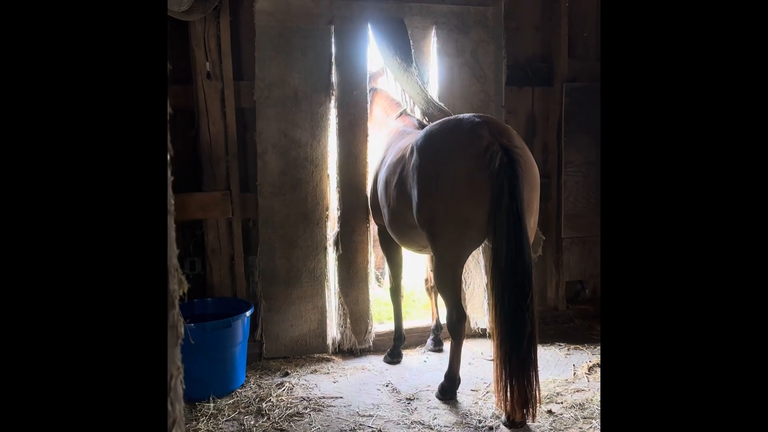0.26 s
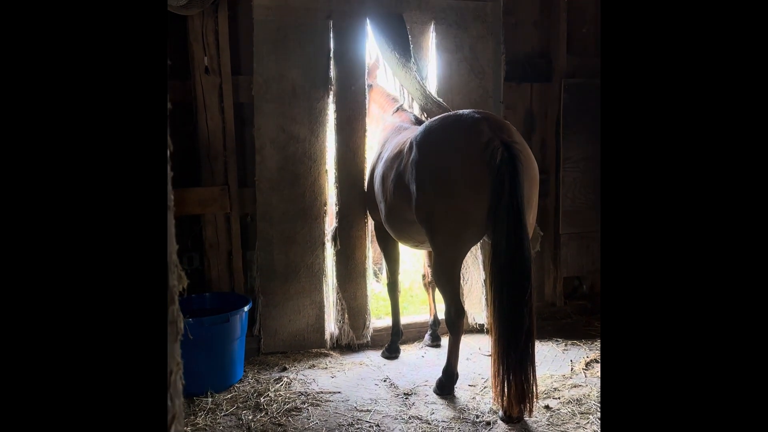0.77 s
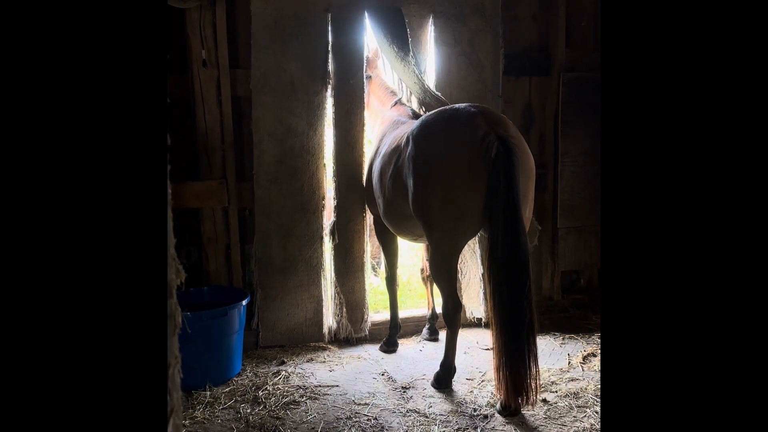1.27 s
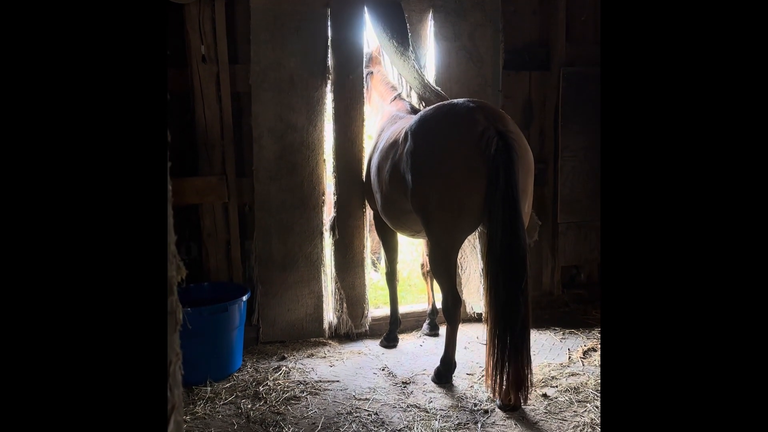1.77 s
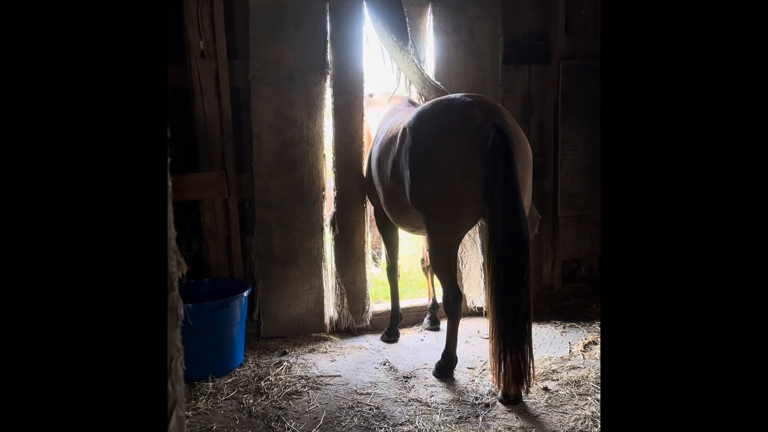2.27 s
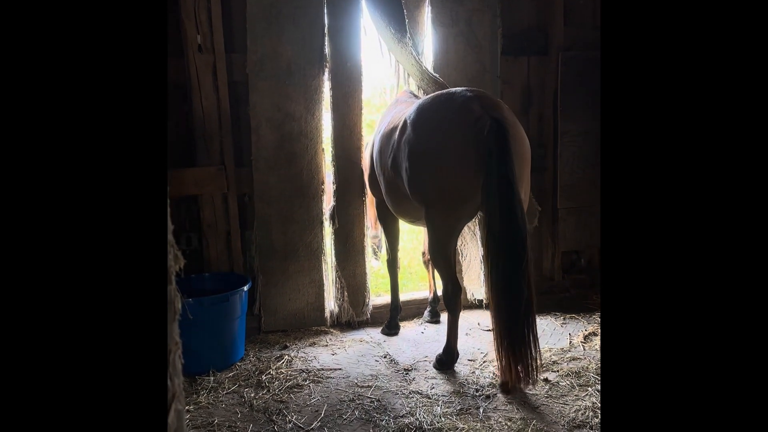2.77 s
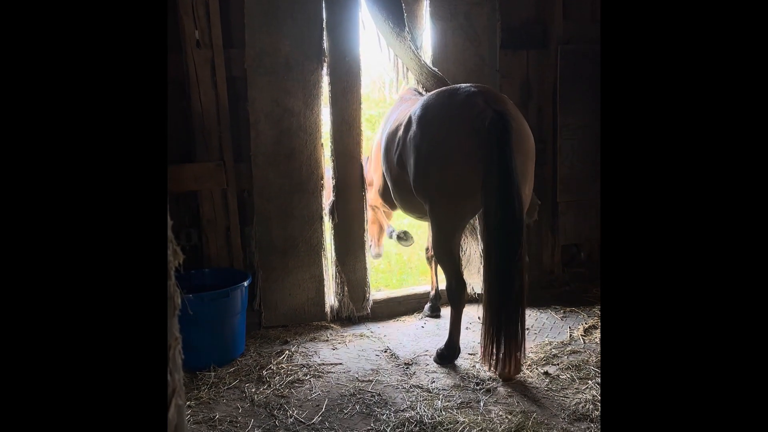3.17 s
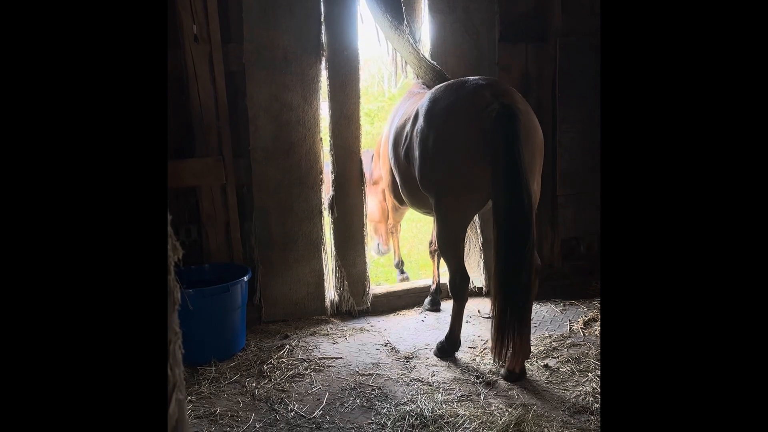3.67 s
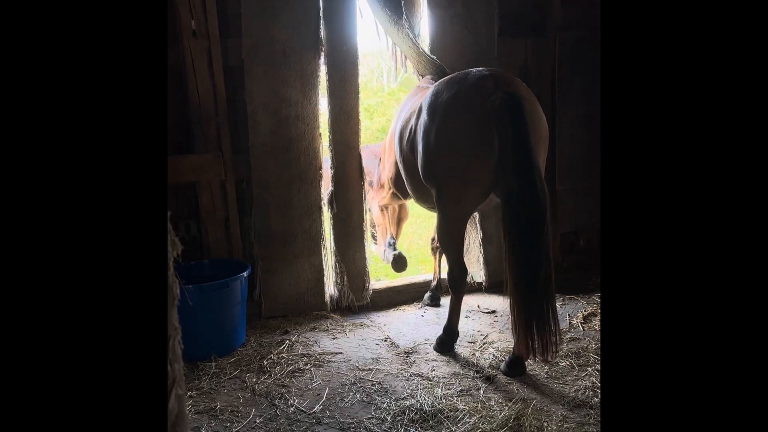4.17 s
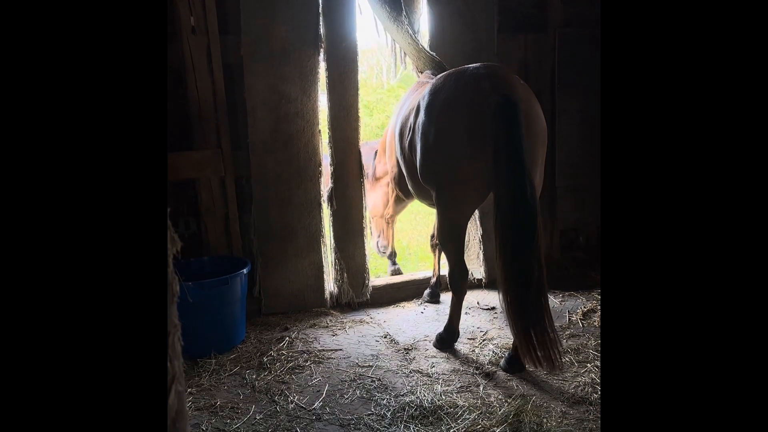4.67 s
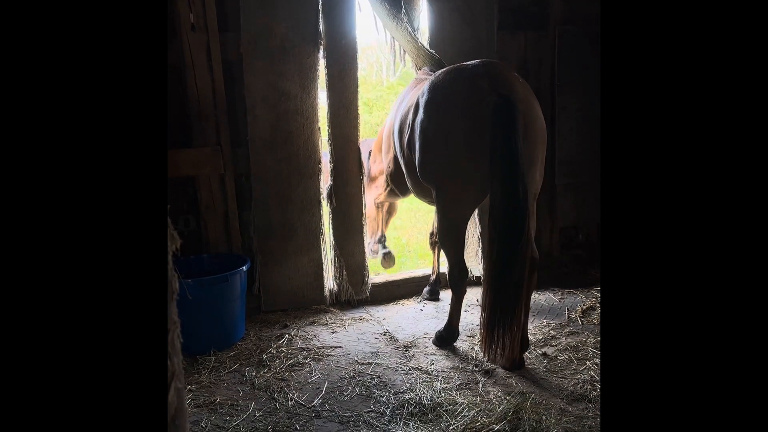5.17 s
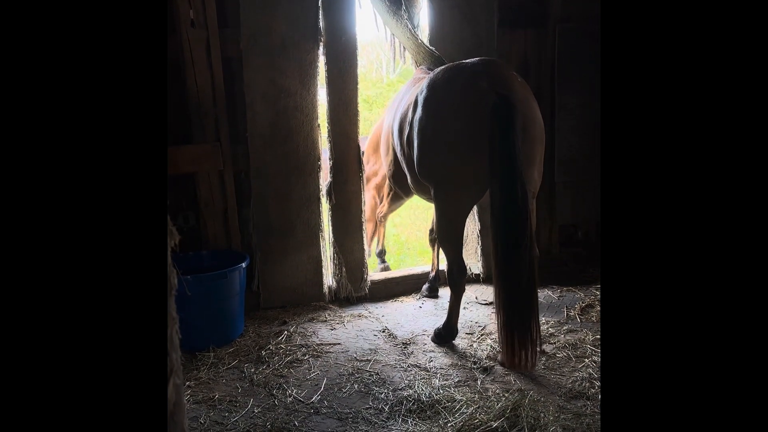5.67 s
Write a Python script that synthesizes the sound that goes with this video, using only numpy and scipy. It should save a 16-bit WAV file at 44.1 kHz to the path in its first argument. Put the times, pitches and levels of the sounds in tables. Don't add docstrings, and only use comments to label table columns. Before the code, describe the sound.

Low distant engine rumble in a barn, a finger rubbing the microphone, then straw crackles, hoof drags and heavy wooden thuds.

```python
import sys
import numpy as np
from scipy import signal
from scipy.fft import rfft, irfft
from scipy.io import wavfile
from scipy.ndimage import uniform_filter1d

SR = 44100
rng = np.random.default_rng(int(sys.argv[2]) if len(sys.argv) > 2 else 0)


def store_wav(level_fs):
    pcm = np.round(np.clip(np.atleast_2d(level_fs), -1, 1) * 32767)
    wavfile.write(sys.argv[1], SR, pcm.T.astype(np.int16))


def gain_from_db(level_db):
    decades = np.asarray(level_db, float) / 20
    return 10 ** decades


N = 261072


def evened(x):
    return x / np.sqrt(np.mean(x ** 2) + 1e-20)


def read(points, hz, axis=1):
    table = np.transpose(points)
    return np.interp(np.log(hz + 1), np.log(table[0] + 1), table[axis])


def curves(rows, t):
    s, *columns = np.transpose(rows)
    return [np.interp(t, s, c) for c in columns]


def add(mix, s, sound):
    part = mix[round(s * SR):][:len(sound)]
    part += sound[:len(part)]


def coloured(x, points):
    hz = np.fft.rfftfreq(len(x), 1 / SR)
    inside = (hz > points[0][0]) & (hz < points[-1][0])
    return evened(irfft(rfft(x) * gain_from_db(read(points, hz)) * inside, len(x)))


def resonate(x, hz, width):
    turn = np.exp(2j * np.pi * hz * np.arange(len(x)) / SR)
    r = np.exp(-np.pi * width / SR)
    smooth = signal.lfilter([1], np.convolve([1, -r], [1, -r]), x / turn)
    return evened((turn * smooth).real)


def struck(force, modes):
    return evened(sum(gain_from_db(db) * resonate(force, hz, width) for hz, width, db in modes))


def wander(size, count=N):
    return evened(uniform_filter1d(uniform_filter1d(rng.standard_normal(count), size), size))


def grains(count, per_s, spread_db):
    hit = rng.random(count) < per_s / SR
    sign = rng.standard_normal(count)
    size = rng.exponential(1, count)
    return evened(hit * sign * gain_from_db(spread_db * np.minimum(size, 4)))


def stroke(t, start, swell, hold, swell_db, release_db_per_s):
    rise = np.clip((t - start) / max(swell, .002), 0, 1)
    release = release_db_per_s * np.maximum(t - start - swell - hold, 0)
    return np.where(t < start, -120, swell_db * (rise - 1) - release)


# t/s, nearness level/dB, load (-1 idle to 1 pulling)
MACHINERY = [
    (0.0, -4.5, -1.04),
    (0.9, -7, -0.36),
    (1.3, -9, -0.34),
    (1.7, 1.5, -0.27),
    (2.3, -2.5, -0.0076),
    (3.0, -2.9, 0.58),
    (3.75, -1.1, 0.12),
    (4.2, 2, -1.2),
    (5.0, -8, 0.61),
    (5.92, -3.5, -0.39),
]
# f/Hz, width/Hz
DRONES = [(104, 4), (224, 17.8)]
# f/Hz, level/dB per Hz
RUMBLE = [(8.8, -69), (15, -26.5), (22, -36), (24, -21.5), (36, -6), (65, 8.5), (97, 6), (128, 2),
          (210, -6), (330, -26.5), (430, -54.5), (730, -120)]
# f/Hz, level/dB per Hz
ROAR = [(150, -40.5), (250, 0), (270, -3.5), (344, -6.5), (572, -14), (690, -15), (842, -13.5),
        (951, -16.5), (1460, -28), (1730, -40.5), (3500, -46.5), (4550, -77.5), (7700, -120)]
# f/Hz, level/dB per Hz
AIR = [(1470, 6.5), (2500, -2), (3040, -16.5), (4020, -8), (4950, -14.5), (5920, 0), (6650, -14),
       (7830, -9.5), (9810, -18.5), (12100, -28.5), (16000, -39.5)]
def far():
    near_db, load = curves(MACHINERY, np.arange(N) / SR)
    a, b, c, d, e = rng.standard_normal((5, N))
    out = gain_from_db(-42 + near_db + 0.27 * wander(size=2000)) * coloured(a, RUMBLE)
    roar_db = -55.5 + 0.29 * near_db + 2 * load + 0.91 * wander(size=1500)
    out += gain_from_db(roar_db) * coloured(b, ROAR)
    for db, load_db, noise, (hz, width) in zip((-52.5, -56), (15, -6.5), (c, d), DRONES):
        out += gain_from_db(db + load_db * load) * resonate(noise, hz, width)
    return out + gain_from_db(-80.5 + 1.2 * wander(size=800)) * coloured(e, AIR)


# f/Hz, width/Hz, level/dB
BUZZ = (5931.5, 328.5, -87.5)
def insect():
    hz, width, db = BUZZ
    throbs_per_s = 59.8
    t = np.arange(N) / SR
    throb = (.5 + .5 * np.cos(2 * np.pi * throbs_per_s * t)) ** 6.3 + .08
    phase = 2 * np.pi * np.cumsum(hz * (1 + .015 * wander(size=400))) / SR
    teeth = np.cos(phase) + 1.2 * rng.standard_normal(N)
    return gain_from_db(db + 2.1 * wander(size=1500)) * resonate(throb * teeth, hz, width)


# start t/s, swell t/s, hold t/s, level/dB
RUB = [
    (.44, .06, .01, -64),
    (1.02, .04, .05, -50),
    (1.1, .04, .055, -47),
    (1.2, .02, .17, -55),
]
# f/Hz, level/dB per Hz
RUB_COLOUR = [(30, -30), (70, -6), (220, 0), (370, -11), (580, -14), (850, -13), (1250, -15), (1800, -22),
              (2700, -33), (3900, -41), (5200, -40), (6300, -44), (8000, -46), (10000, -57), (13000, -62)]
# t/s, length t/s, f/Hz, width/Hz, level/dB
SQUEAK = (1.075, .135, 8250, 600, -74)
# t/s, level/dB
CREAKS = [(1.224, -59), (1.236, -63), (1.276, -67), (1.317, -59), (1.333, -54), (1.408, -45), (1.433, -44),
          (1.457, -44), (1.482, -44), (1.518, -42), (1.583, -40), (2.68, -48)]
# f/Hz, width/Hz, level/dB
CASE = [(750, 250, 0), (1250, 350, 0), (1800, 500, -3), (3500, 2500, -10), (5800, 2000, -14),
        (8150, 250, -16)]
def finger():
    t = np.arange(N) / SR
    level = sum(gain_from_db(db + stroke(t, *row, swell_db=24, release_db_per_s=180)) for *row, db in RUB)
    out = level * gain_from_db(1.5 * wander(size=300)) * coloured(grains(N, 3500, 1.8), RUB_COLOUR)
    s, length, hz, width, db = SQUEAK
    hiss = rng.standard_normal(9000)[:round(length * SR)]
    add(out, s, gain_from_db(db) * resonate(hiss, hz, width) * signal.windows.tukey(len(hiss), .6))
    for (s, db), jolt in zip(CREAKS, rng.standard_normal((len(CREAKS), 1500))):
        slip = jolt * np.exp(-np.arange(1500) / 5)
        add(out, s - .001, gain_from_db(db - 18.5) * struck(slip, CASE))
    return out


# f/Hz, level/dB
LEAK = [(100, -24), (700, -26), (1400, -10), (2200, -9), (3000, -11), (4200, -8), (6000, -13), (8100, -3),
        (12000, -12)]
def leak(rub):
    return irfft(1j * rfft(rub) * gain_from_db(read(LEAK, np.fft.rfftfreq(N, 1 / SR))), N)


# t/s, peak level/dB, length t/s, tilt/dB per octave
STRAW = [(0.748, -58.5, 0.0039, 0.5), (0.851, -66, 0.014, -2), (0.902, -57, 0.014, 0.5),
         (0.92, -66, 0.0072, 18), (1.606, -64, 0.0093, 4), (1.861, -74, 0.012, -1), (2.123, -71, 0.01, 8),
         (2.343, -72.5, 0.011, 7), (2.625, -69.5, 0.018, 6.5), (2.872, -77, 0.014, 10),
         (2.979, -42, 0.0065, 5.2), (3.28, -82, 0.011, -10), (3.3523, -68, 0.015, 1.5),
         (3.379, -66, 0.016, 2.5), (3.495, -65, 0.027, 2.5), (3.535, -67, 0.029, 0.5),
         (3.596, -67.5, 0.029, 1), (3.676, -63.5, 0.02, 2.5), (3.831, -69, 0.035, 1.5),
         (3.895, -52, 0.03, 8.5), (4.297, -61.5, 0.0071, 3), (5.025, -64, 0.015, 5),
         (5.271, -65.5, 0.011, 0), (5.365, -64, 0.023, 0.5)]
# f/Hz, level/dB per Hz
GRIT = [(880, -72), (1500, -22.5), (1620, -1), (2160, 0), (2910, -4.5), (4040, -5.5), (4590, -8.5),
        (6560, -5.5), (10700, -12), (11900, -19.5), (12200, -67.5), (14500, -16.5), (16000, -18)]
def straw(peak_db, length, tilt_db):
    t = np.arange(3000) / SR
    colour = [(hz, db + tilt_db * np.log2(hz / 5000)) for hz, db in GRIT]
    snaps = coloured(grains(len(t), 4700, 1.6), colour)
    return gain_from_db(peak_db - 7.5) * snaps * np.exp(-t / max(length, .002)) * (1 - np.exp(-t / 0.00053))


# t/s, length t/s, f/Hz, level/dB
COOS = [
    (1.535, 0.027, 1490, -63.5),
    (1.706, 0.085, 1417, -71),
]
def bird():
    out = np.zeros(N)
    for s, length, hz, db in COOS:
        breath = rng.standard_normal(6000)[:round(length * SR)]
        add(out, s, gain_from_db(db) * resonate(breath, hz, 37) * np.hanning(len(breath)))
    return out


# f/Hz, width/Hz, level/dB
GRIT_RINGS = [(2120, 90, 0), (2570, 120, -6), (4150, 250, -9), (6300, 350, -10)]
# f/Hz, width/Hz, level/dB
RASP = [(570, 360, 9), (777, 120, 3), (972, 180, 2), (1360, 180, -2)]
# f/Hz, width/Hz, level/dB
JUDDER = [(59.5, 52, -3.5), (147.7, 15, 3), (234.8, 40, -7), (275, 103, 4.5), (362, 56, -9.5)]
def drag(swell, hold, grit_db, weight_db):
    t = np.arange(0, .5, 1 / SR)
    count = len(t)
    dull_db = .3 * min(grit_db + 63, 0)
    colour = [(hz, db + dull_db * np.log2(hz / 2000)) for hz, db in GRIT]
    grit_db = grit_db + stroke(t, 0, swell, hold, 22, 303) + 1.2 * wander(size=500, count=count)
    judder_db = weight_db + stroke(t, 0, swell, hold, 22, 163)
    rasp_db = 5.5 + 0.88 * grit_db + (1 - 0.88) * judder_db
    sand = grains(count, 6000, 2.7) * gain_from_db(1.8 * wander(size=150, count=count))
    turns = np.cumsum(68 * (1 + .3 * wander(size=300, count=count))) / SR
    slips = evened(np.diff(np.floor(turns), prepend=0)) + 1.22 * rng.standard_normal(count)
    sound = gain_from_db(grit_db) * coloured(sand, colour)
    sound += gain_from_db((grit_db + rasp_db) / 2 - 16.5) * struck(sand, GRIT_RINGS)
    sound += gain_from_db(rasp_db - 2.0) * struck(sand, RASP)
    sound += gain_from_db(judder_db - 1.0) * struck(slips, JUDDER)
    return sound * np.minimum(t / .004, 1)


# start t/s, swell t/s, hold t/s, grit level/dB, weight on the planks level/dB
DRAGS = [(2.955, .026, .003, -59, -50), (2.985, .01, .035, -70, -54), (3.893, .022, .12, -62, -37),
         (3.99, .022, .02, -66, -36), (4.546, .006, .03, -71, -31), (4.612, .02, .03, -63, -42),
         (4.67, .016, .035, -55, -44), (4.735, .03, .035, -56, -39), (5.084, .012, .02, -73, -27),
         (5.1, .05, .015, -62, -36), (5.195, .014, .01, -75, -43), (5.452, .018, .012, -66, -29),
         (5.52, .026, .01, -70, -37), (5.56, .165, .005, -60, -39), (5.715, .025, .012, -54, -42),
         (5.75, .022, .05, -54, -37), (5.905, .012, .01, -66, -58)]
def drags():
    out = np.zeros(N)
    for s, *row in DRAGS:
        add(out, s, drag(*row))
    return out


# f/Hz, level/dB, t60/s, sense of first swing, group (0 hollow, 1 plank, 2 sill)
FLOOR = [(60.7, -13.7, .7, -1, 0), (65.8, -16.9, .65, 1, 0), (80.6, -17.1, .37, 1, 0),
         (97.7, -23.5, .6, 1, 0), (125.4, -26.6, .8, -1, 1), (136.6, -15.5, .41, 1, 1),
         (160.7, -13.7, .21, 1, 1), (177, -15, .16, 1, 1), (209, -33, .25, -1, 2), (224, -33, .25, 1, 2),
         (268, -31, .25, 1, 2), (285, -31, .3, 1, 2), (350, -31, .14, -1, 2), (372, -31, .14, 1, 2)]
def boom(*groups_db):
    late = np.maximum(np.arange(SR) / SR - .010, 0)
    modes = np.zeros(SR)
    for hz, db, t60, sense, group in FLOOR:
        decay = gain_from_db(db + groups_db[int(group + .5)] - 60 * late / t60)
        modes += np.sign(sense) * decay * np.sin(2 * np.pi * hz * late)
    return modes * (1 - np.exp(-late / .013))


# f/Hz, width/Hz, level/dB
KNOCK = [(410, 22, 4), (550, 700, 8.5), (694, 326, 7), (1250, 720, -4.5), (2060, 240, -7),
         (3180, 290, -19.5)]
def knock(db):
    t = np.arange(4000) / SR
    tilt_db = -0.56 * (db + 40.5)
    modes = [(hz, width, level + tilt_db * np.log2(hz / 800)) for hz, width, level in KNOCK]
    burst = struck(rng.standard_normal(len(t)), modes)
    return gain_from_db(db) * burst * np.exp(-t / 0.021) * (1 - np.exp(-t / 0.001)) ** 2


# t/s, hollow boom level/dB, plank level/dB, sill level/dB, horn knock level/dB
STAMPS = [
    (3.895, -14, -13, -17, -58),
    (4.549, 0.4, 1.5, -20, -37),
    (5.085, -18, -20.5, 1.5, -36),
    (5.4584, -1.5, -4, -8, -53.5),
]
def stamps():
    floor, horn = np.zeros((2, N))
    for s, hollow_db, plank_db, sill_db, knock_db in STAMPS:
        add(floor, s, boom(hollow_db, plank_db, sill_db))
        add(horn, s, knock(knock_db))
    return floor, horn


def shake():
    t = np.arange(N) / SR
    a, b = rng.standard_normal((2, N))
    level = sum(gain_from_db(boom_db + stroke(t, s, .08, 0, 22, 62.5)) for s, boom_db, *_ in STAMPS)
    return gain_from_db(-24) * level * (coloured(a, RUMBLE) + gain_from_db(-26.5) * coloured(b, ROAR))


# f/Hz, t60/s
BARN_T60 = [(200, 0.15), (1000, 0.27), (8000, 0.11)]
def barn(x):
    taps = np.zeros(SR // 2)
    at = np.arange(300, len(taps) - 20, 20)
    taps[at + rng.integers(0, 20, len(at))] = rng.choice([-1., 1.], len(at))
    hz, t, z = signal.stft(taps, SR, nperseg=256)
    decay = gain_from_db(-60 * t / read(BARN_T60, hz)[:, None])
    tail = signal.istft((hz[:, None] > 0) * z * decay, SR, nperseg=256)[1]
    return signal.oaconvolve(x, tail / np.linalg.norm(tail))[:N]


# f/Hz, side over mid level/dB, likeness (0-1), side phase/rad
PORTS = [(60, -27.5, 0.1, 6.5), (224, -23, 0.5, -1.5), (370, -19, 0.4, -0.7), (560, -5.5, .8, -2.9),
         (1200, -3.5, .7, -3.2), (1850, -8.5, 0, -1.5), (2420, 2.5, 0.5, -1.5), (3100, -3.5, .45, -2),
         (5240, 5, .3, -1.5), (5800, -14.5, .2, -14), (6900, -5.5, .2, -1.5), (7400, -8.5, .7, -1.5),
         (9900, 5, .75, -1.5), (12000, 10.5, 0.3, -1.5)]
def ports(mid):
    hz = np.fft.rfftfreq(N, 1 / SR)
    z = signal.stft(mid, nperseg=256)[2]
    scattered = z * np.exp(2j * np.pi * rng.random(z.shape))
    twin = signal.istft(scattered, nperseg=256)[1][:N]
    like = np.clip(read(PORTS, hz, axis=2), 0, 1)
    turned = like * np.exp(1j * read(PORTS, hz, axis=3)) * rfft(mid)
    return irfft(gain_from_db(read(PORTS, hz)) * (turned + np.sqrt(1 - like ** 2) * 1.1 * rfft(twin)), N)


def scene():
    floor, horse = stamps()
    horse += drags()
    for s, *row in STRAW:
        add(horse, s, straw(*row))
    mid = floor + shake() + horse + gain_from_db(-9.5) * barn(horse) + far() + insect() + bird()
    rub = finger()
    side = ports(mid) + rub
    mid = mid + leak(rub)
    return np.array([mid + side, mid - side])


def narrow(side, hz, t):
    snap = np.clip((t - 1.5) / .012, .07, 1)
    edge_hz = 500 * snap / 2 ** (1.75 * np.maximum(t - 4.1, 0))
    return side / (1 + (edge_hz / hz) ** 14.0)


# start t/s, swell t/s, hold t/s, level/dB
TREBLE_DUCKS = [
    (1.25, .15, .2, -6),
    (2.675, .01, .035, -8),
]
def duck(mid, hz, t):
    start_s, end_s = 1.075, 1.5
    lift = np.clip((t - end_s) / .09 + 1, 0, 1)
    low, high = 400 * 2 ** (1.1 * lift), 1000 * 2 ** (.4 * lift)
    depth_db = -38 * np.clip(np.minimum(t - start_s, end_s - t) / .03 + .5, 0, 1)
    patches = uniform_filter1d(rng.standard_normal(mid.shape), size=3, axis=0)
    patches = evened(uniform_filter1d(patches, size=8, axis=1))
    depth_db = depth_db * np.clip(.9 + lift + .45 * patches, .1, 1.4)
    mid = mid * gain_from_db(depth_db / (1 + (low / hz) ** 6) / (1 + (hz / high) ** 8))
    treble_db = np.zeros(len(t))
    for s, swell, hold, db in TREBLE_DUCKS:
        treble_db += db * np.interp(t - s, [0, swell, swell + hold, swell + hold + .015], [0, 1, 1, 0])
    return mid * gain_from_db(treble_db / (1 + (1300 / hz) ** 4))


def low_pass(x):
    return signal.sosfilt(signal.butter(12, 16450, fs=SR, output="sos"), x)


def record(dry):
    centre_and_side = [dry[0] + dry[1], dry[0] - dry[1]]
    hz, t, (mid, side) = signal.stft(centre_and_side, SR, nperseg=1024, noverlap=768)
    hz = hz[:, None] + 1
    side = narrow(side, hz, t)
    mid = duck(mid, hz, t)
    out = signal.istft([mid + side, mid - side], SR, nperseg=1024, noverlap=768)[1][:, :N] / 2
    return low_pass(out)


dry = scene()
out = record(dry)
store_wav(out)
```